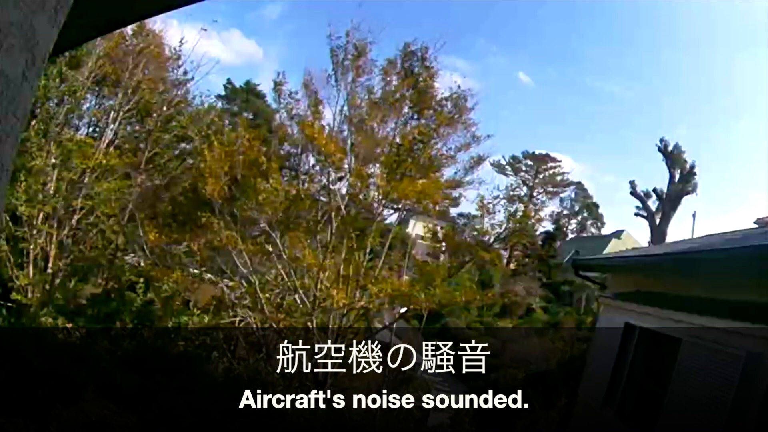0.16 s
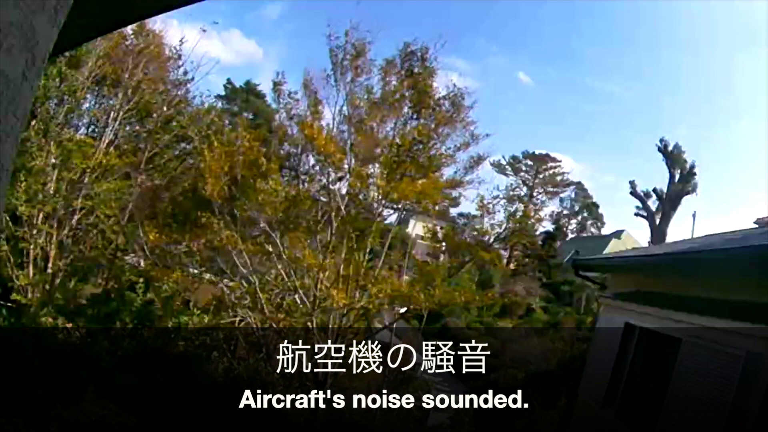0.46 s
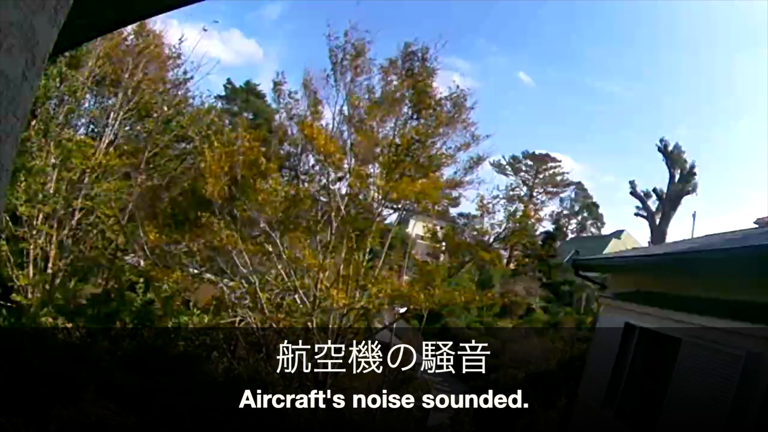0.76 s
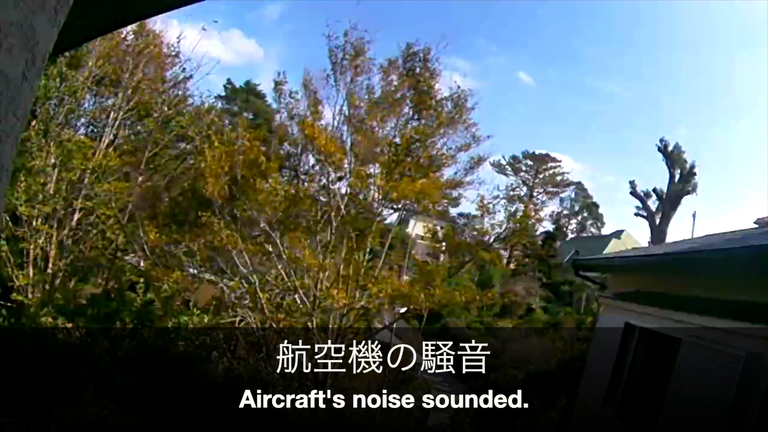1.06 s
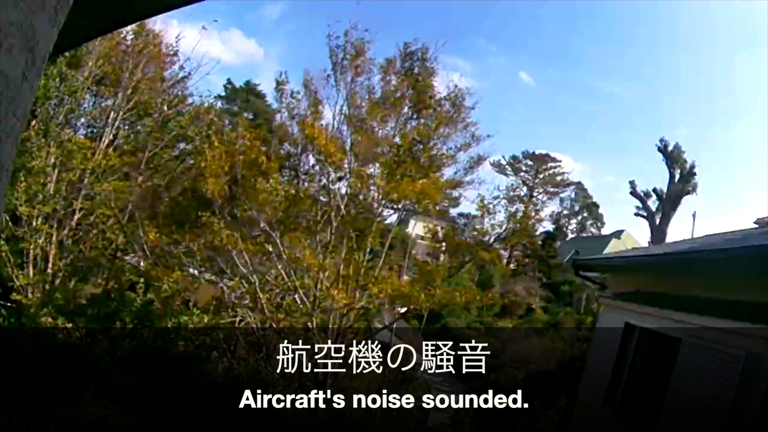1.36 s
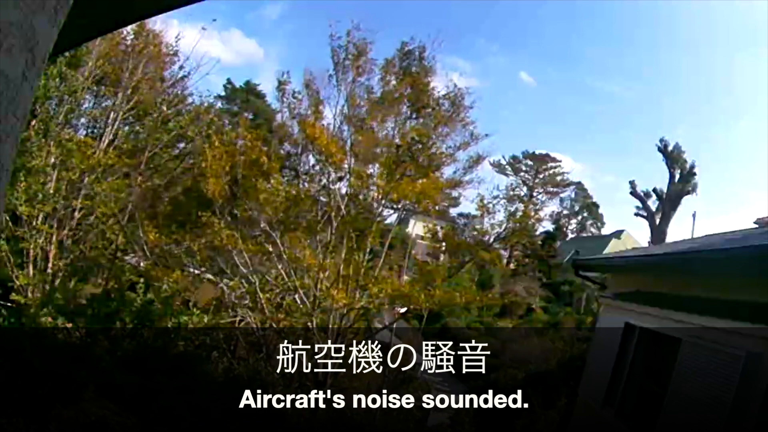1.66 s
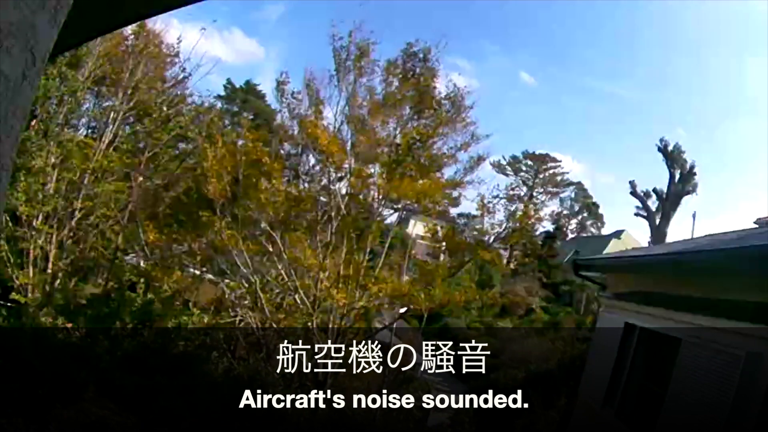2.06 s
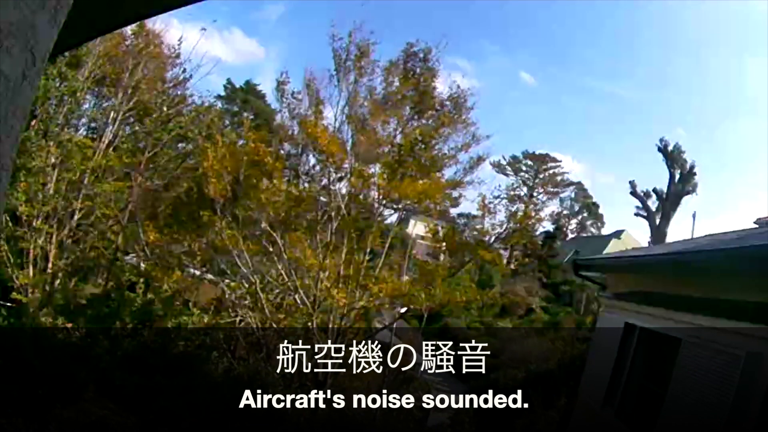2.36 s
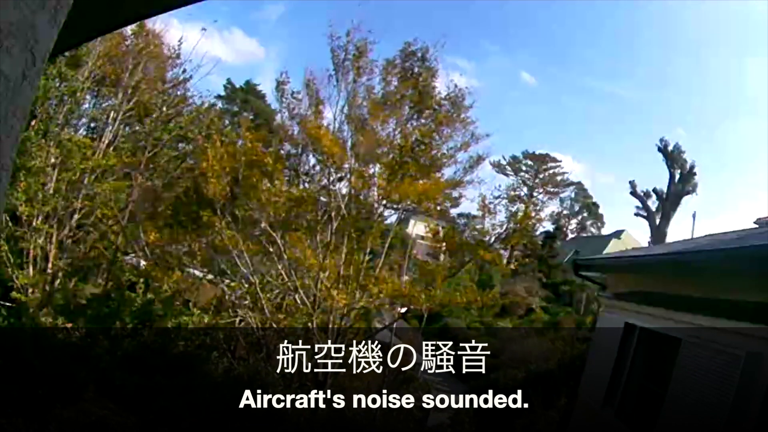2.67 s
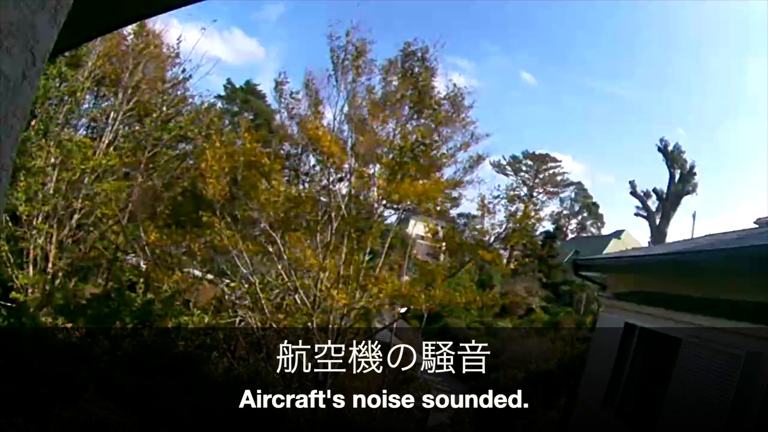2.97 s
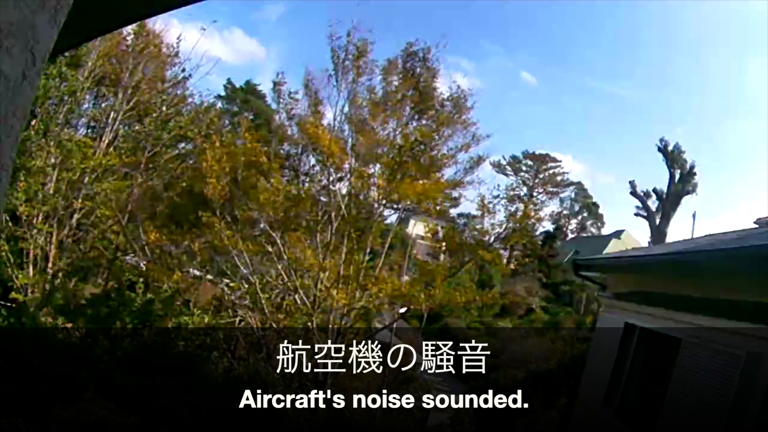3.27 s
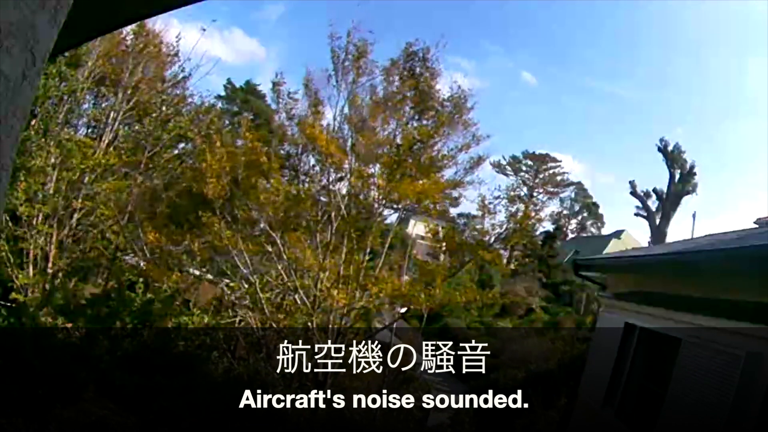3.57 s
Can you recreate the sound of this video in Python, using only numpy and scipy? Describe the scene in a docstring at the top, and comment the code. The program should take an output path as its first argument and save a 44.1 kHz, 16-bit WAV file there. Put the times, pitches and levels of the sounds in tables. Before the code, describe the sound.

A distant propeller aircraft drones low, heard outdoors beside a house, its pitch sinking slowly throughout. The hum is loudest at the start and drops by 0.5 seconds, as a faint airy rush swells with a thin, fading whine. The drone wavers, swells again from about 2.5 to 3.3 seconds, then eases off. A soft engine rumble and a faint steady hiss continue underneath.

```python
"""Beside a house, one microphone in the open air, a propeller aircraft droning away in the distance.
The blade tone sinks as it recedes, and each overtone swells and fades on its own as the paths
through the air shift. Under it lie a low exhaust rumble, a far rush that comes in swells with
a few faint resonances, a thin whine and a steady hiss."""
import sys
import numpy as np
from scipy.fft import rfft, irfft, next_fast_len
from scipy.io import wavfile
from scipy.ndimage import map_coordinates

SR = 44100
rng = np.random.default_rng(int(sys.argv[2]) if len(sys.argv) > 2 else 0)


def wav_record(signal):
    """Record a signal, one row per channel, as 16-bit PCM in the file named by sys.argv[1]."""
    frames = np.transpose(np.atleast_2d(signal))
    bounded = np.clip(frames, -1, 1)
    # unit amplitude maps onto the largest positive 16-bit level
    quanta = np.round(bounded * 32767).astype(np.int16)
    wavfile.write(sys.argv[1], SR, quanta)


N = 163170
T = np.arange(N) / SR
FLUTTER_PER_S = 15

# The blade tone and its next three harmonics, fading in and out with distance: time_s, level_db
BLADE_LEVEL = [(0.05, -17), (0.27, -18), (0.54, -27), (1.2, -25.5), (1.32, -29), (1.42, -25.5), (1.55, -29),
               (1.65, -25.5), (1.73, -31.5), (1.81, -27), (1.91, -30.5), (2.49, -26.5), (2.58, -22.5),
               (2.94, -25), (2.99, -30.5), (3.26, -25), (3.5, -33.5), (3.65, -32.5)]
SECOND_LEVEL = [(0, -38), (.35, -33.5), (.63, -31), (.98, -33), (1.15, -44), (1.3, -47), (1.6, -46.5),
                (1.95, -40.5), (2.15, -40.5), (2.52, -36), (2.8, -26.5), (3.0, -31.5), (3.24, -30),
                (3.42, -38), (3.7, -35.5)]
THIRD_LEVEL = [(0, -56.5), (.8, -53.5), (1.4, -48.5), (1.65, -53.5), (2.0, -44), (2.2, -46), (2.851, -49),
               (3.201, -42.5), (3.7, -50)]
FOURTH_LEVEL = [(0, -61.5), (2.0, -63), (2.5, -57), (2.9, -52.5), (3.15, -63), (3.7, -56.5)]

def propeller(near_hz=74.0, far_hz=61.0, recede_s=4.6, flutter_db=.61, flutter_rad=.07, trim_db=-.13):
    """Far off: harmonics of the blade rate, sinking with the Doppler shift and shaken by turbulence."""
    pitch_hz = far_hz + (near_hz - far_hz) * np.exp(-T / recede_s)
    phase = 2 * np.pi * np.cumsum(pitch_hz) / SR
    drone = np.zeros(N)
    for k, rows in enumerate([BLADE_LEVEL, SECOND_LEVEL, THIRD_LEVEL, FOURTH_LEVEL], 1):
        # turbulence shakes level and phase, more for higher harmonics
        shake = amp(k * flutter_db * wobble(FLUTTER_PER_S))
        drift = k * flutter_rad * wobble(FLUTTER_PER_S) + rng.uniform(0, 2 * np.pi)
        drone += level(rows) * unit(shake * np.sin(k * phase + drift))
    return amp(trim_db) * drone


# Colour of the exhaust: frequency_hz, relative_db
EXHAUST_SPECTRUM = [(20, -21), (35, -10.5), (48, -11), (85, -3.5), (108, 2), (140, -1.5), (172, 2),
                    (205, -10), (240, -18), (400, -44.5)]
# Its rise and fall: time_s, level_db
EXHAUST_LEVEL = [(0, -44.5), (.4, -41.5), (.9, -38), (1.5, -42.5), (2.2, -44), (2.7, -42), (3.2, -44.5),
                 (3.7, -42.5)]

def exhaust_rumble(trim_db=-.5):
    """Low exhaust noise from the distant aircraft, lying around the blade tones."""
    return amp(trim_db) * level(EXHAUST_LEVEL) * band(EXHAUST_SPECTRUM)


# Colour of each band of the rush: frequency_hz, relative_db
DEEP_SPECTRUM = [(170, -40), (235, -8), (272, -2.5), (295, -6.5), (332, 0), (350, -1), (384, 2), (408, -10),
                 (470, -32.5)]
LOW_SPECTRUM = [(380, -31.5), (428, -2.5), (455, -1), (470, -9.5), (503, 2.5), (535, -3), (556, 1),
                (600, -5), (650, -9), (705, -13.5), (900, -40)]
MID_SPECTRUM = [(550, -35.5), (720, -5.5), (850, -2.5), (940, 0.5), (1010, -1), (1120, -6), (1220, -5.5),
                (1400, -5), (1550, -12), (1900, -41)]
HIGH_SPECTRUM = [(1200, -33.5), (1530, -2), (1700, 0), (1880, 2), (2150, -4.5), (2380, -2.5), (2660, -18.5),
                 (2820, -11), (3000, -18), (3600, -24.5), (5000, -50)]
# The swells of each band: time_s, level_db
DEEP_SWELLS = [(0.06, -52), (0.66, -43.5), (1.18, -54), (1.27, -48), (2.01, -48), (2.29, -53.5),
               (2.32, -46.5), (2.92, -44), (3.16, -50), (3.66, -47.5)]
LOW_SWELLS = [(0, -49.5), (.25, -47), (.45, -43), (.68, -41), (.85, -48), (1.12, -51), (1.35, -48),
              (1.85, -51), (2.3, -45), (2.65, -48), (2.88, -45.5), (3.15, -52), (3.7, -47.5)]
MID_SWELLS = [(0.05, -55.5), (0.53, -47), (0.54, -43.5), (0.71, -43), (0.8, -50), (1.04, -52.5),
              (1.58, -50.5), (1.7, -53.5), (2.1, -57), (2.31, -47.5), (2.52, -54.5), (2.93, -48),
              (3.06, -52.5), (3.66, -48.5)]
HIGH_SWELLS = [(0.05, -57), (0.33, -57.5), (0.36, -51.5), (0.69, -48), (0.81, -52.5), (1.01, -50.5),
               (1.2, -58.5), (2.19, -60.5), (2.34, -52.5), (2.71, -59.5), (2.87, -53), (2.9, -57),
               (3.6, -58), (3.66, -53)]

def air_rush(flutter_db=.5):
    """Distant air noise reaches the microphone in four bands that swell and flutter."""
    bands = [(DEEP_SPECTRUM, DEEP_SWELLS, 0), (LOW_SPECTRUM, LOW_SWELLS, -.5),
             (MID_SPECTRUM, MID_SWELLS, -1), (HIGH_SPECTRUM, HIGH_SWELLS, -1)]
    rush = np.zeros(N)
    for spectrum, swells, trim_db in bands:
        gain = amp(trim_db + flutter_db * wobble(FLUTTER_PER_S))
        rush += gain * level(swells) * band(spectrum)
    return rush


# Narrow resonances in the first swell: pitch_hz, width_hz, relative_db
SWELL_RESONANCES = [(455.3, 7.3, 1), (507, 12, 0), (551, 5.2, 2.5), (624.5, 14, -6.5), (815, 15, -6),
                    (940, 10, -6.5), (990, 23, -3.5), (1202, 60, -14), (2070, 40, -15.5)]
# Colour of its thin bright edge: frequency_hz, relative_db
EDGE_SPECTRUM = [(1700, -34), (2050, 1), (2300, -2), (2550, -2.5), (2640, -8), (2750, -21.5), (3300, -45.5)]
# The edge rising with the swell, then fading: time_s, level_db
EDGE_FADE = [(0, -66), (.3, -65), (.65, -56), (1.05, -58.5), (1.3, -67.5), (3.7, -82.5)]

def ringing_swell(peak_s=.62, width_s=.23, peak_db=-41.5):
    """Faint resonances and a bright edge ride on the first, strongest swell of the rush."""
    ring = noise(lambda f: sum(amp(db) * resonance(f, hz, width) for hz, width, db in SWELL_RESONANCES))
    swell = np.exp(-.5 * ((T - peak_s) / width_s) ** 2)
    edge = level(EDGE_FADE) * band(EDGE_SPECTRUM)
    return amp(peak_db) * swell * ring + edge


# The howl at the microphone: time_s, level_db
HOWL_SWELLS = [(0, -71.5), (2.1, -66.5), (2.28, -50.5), (2.5, -64.5), (3.1, -57), (3.5, -48.5), (3.7, -48)]

def howl(pitch_hz=974, width_hz=160):
    """A hollow band of the distant rush flares once, then grows toward the end."""
    return level(HOWL_SWELLS) * noise(lambda f: resonance(f, pitch_hz, width_hz))


def whine(start_hz=2605, sag_hz_per_s=90, wander_hz=14, wander_per_s=60,
          start_db=-65.5, fade_db_per_s=8):
    """A faint, unsteady whine sinks and fades."""
    pitch_hz = start_hz - sag_hz_per_s * T + wander_hz * wobble(wander_per_s)
    flicker = 1 + .5 * wobble(wander_per_s)
    tone = unit(flicker * np.sin(2 * np.pi * np.cumsum(pitch_hz) / SR))
    return amp(start_db - fade_db_per_s * T) * tone


# Colour of the hiss: frequency_hz, relative_db
HISS_SPECTRUM = [(20, 2), (2500, 2.5), (3600, -2.5), (5000, -1.5), (6600, -2.5), (7200, -5.5),
                 (7600, -13.5), (8000, -24.5)]

def hiss(level_db=-61):
    """A steady, broad hiss behind everything."""
    return amp(level_db) * band(HISS_SPECTRUM)


def amp(db):
    """Decibels to gain."""
    return 10 ** (np.asarray(db) / 20)


def unit(x):
    """x at rms 1."""
    return x / np.sqrt(np.mean(x ** 2) + 1e-20)


def level(rows):
    """Gain per sample from rows of time_s, level_db."""
    return amp(np.interp(T, *np.transpose(rows)))


def wobble(knots_per_s):
    """A smooth random curve."""
    return map_coordinates(rng.standard_normal(int(N * knots_per_s / SR) + 4), [T * knots_per_s])


def resonance(hz, centre_hz, width_hz):
    """A peak of gain 1, width_hz wide at half its height."""
    return 1 / (1 + (2 * (hz - centre_hz) / width_hz) ** 2)


def noise(response):
    """Steady noise of rms 1 with a given frequency response."""
    size = next_fast_len(N + 8192)
    spectrum = rfft(rng.standard_normal(size)) * response(np.fft.rfftfreq(size, 1 / SR))
    return unit(irfft(spectrum, size)[:N])


def band(spectrum):
    """Noise of rms 1 coloured by rows of frequency_hz, relative_db, silent above the last."""
    f, db = np.transpose(spectrum)
    return noise(lambda hz: amp(np.interp(np.log(hz + 1), np.log(f + 1), db, right=-np.inf)))


def scene():
    """From beside the house, in mono: the distant aircraft over the rush and the hiss."""
    air = air_rush() + ringing_swell() + howl()
    return (propeller() + exhaust_rumble() + air + whine() + hiss())[None]


def record(dry, top_hz=7900):
    """The recorder keeps nothing above its band limit."""
    size = next_fast_len(N + SR // 2)
    passband = np.fft.rfftfreq(size, 1 / SR) < top_hz
    return irfft(rfft(dry, size) * passband, size)[:, :N]


dry = scene()
out = record(dry)
wav_record(out)
```